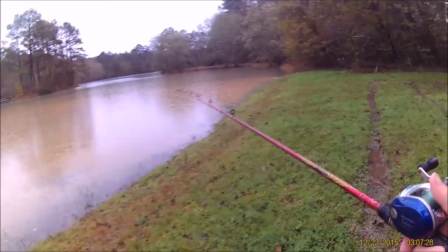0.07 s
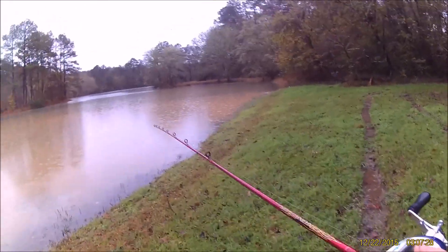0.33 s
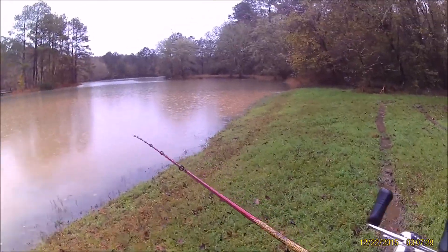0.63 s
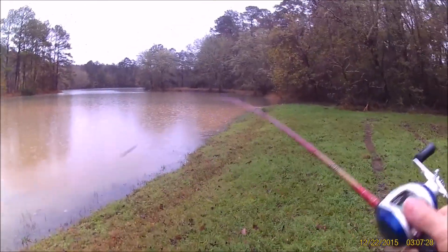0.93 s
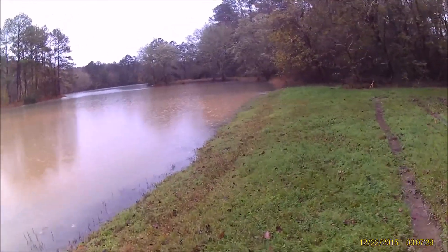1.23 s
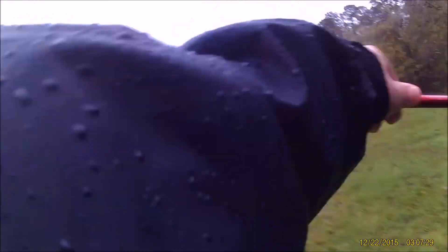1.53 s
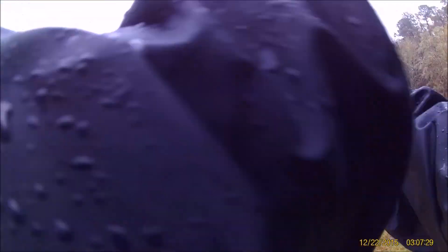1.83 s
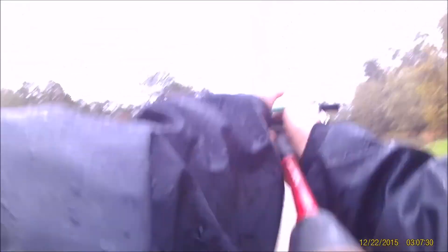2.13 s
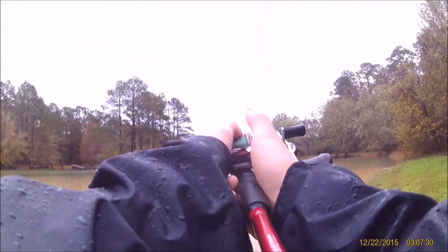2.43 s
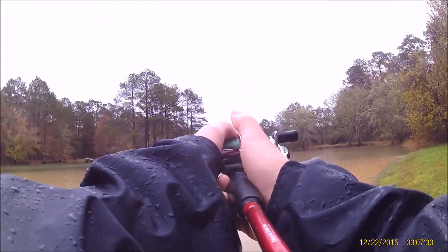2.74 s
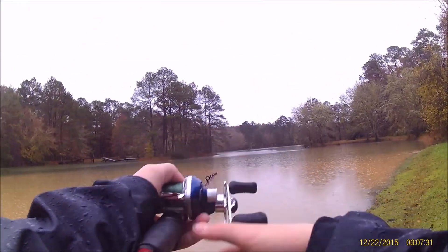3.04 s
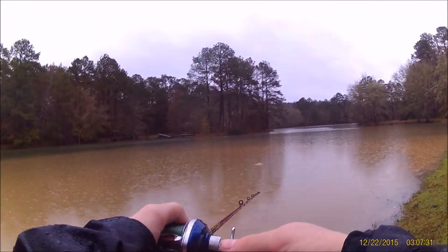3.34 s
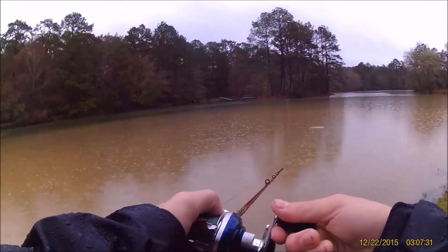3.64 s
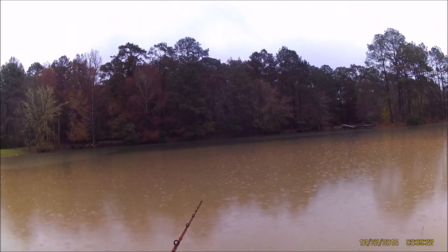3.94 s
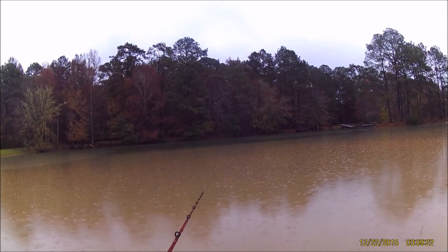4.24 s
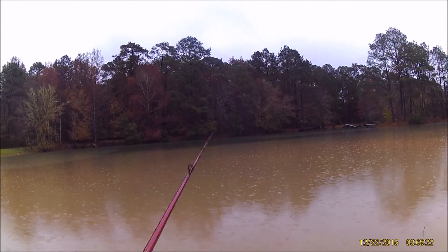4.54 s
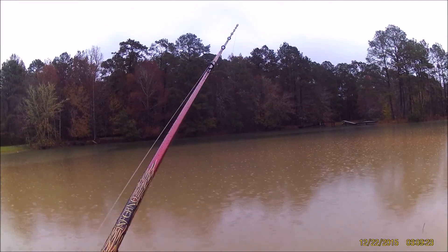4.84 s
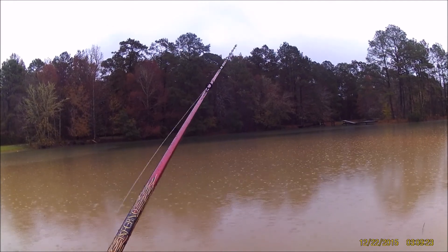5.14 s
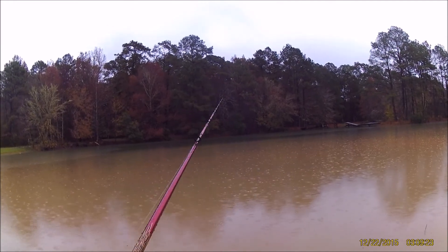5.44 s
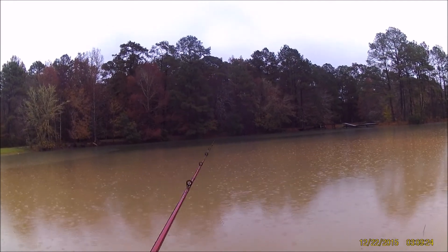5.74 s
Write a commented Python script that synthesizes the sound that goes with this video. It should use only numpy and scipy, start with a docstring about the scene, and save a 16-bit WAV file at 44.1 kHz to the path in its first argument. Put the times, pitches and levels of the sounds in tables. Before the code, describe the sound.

Close sleeve rustle and rumble, a faint whisk of fishing line and one sharp reel click, over light rain and thin electronic hiss.

```python
"""An angler casts across a pond in light rain, heard by a small camera worn on the chest.
From the start, jacket sleeves scrape and rumble on its case over rain, breeze and an electronic whine.
From 1 s the electronics hiss in bursts and drops tick on the case; near 1.7 s the arm bumps it.
At 2.2 s line whisks off the spool, and at 2.8 s the reel snaps into gear.
Then the movements thin out, leaving a deep, even throb under the rain and hiss."""
import sys
import numpy as np
from scipy import signal
from scipy.fft import rfft, irfft
from scipy.io import wavfile
from scipy.ndimage import uniform_filter1d

SR = 44100
rng = np.random.default_rng(int(sys.argv[2]) if len(sys.argv) > 2 else 0)


def pcm_store(signal):
    """Save signal as 16-bit PCM."""
    levels = np.round(np.clip(np.atleast_2d(signal), -1, 1) * 32767)
    wavfile.write(sys.argv[1], SR, levels.astype(np.int16).T)


N = 264070
T = np.arange(N) / SR

# Cloth-on-plastic spectrum: (frequency [Hz], density [dB])
SCRAPE_SPECTRUM = [(300, -17), (450, -5.5), (800, -6.5), (1080, -9), (1320, 3), (1550, 0), (2000, -1.5),
                   (2600, -10), (3050, -18.5), (3500, -18.5), (4400, -23), (5200, -35), (6800, -35.5),
                   (8200, -41)]
# Folding-cloth spectrum: (frequency [Hz], density [dB])
CRINKLE_SPECTRUM = [(2300, 8), (2700, -4), (3100, -7), (3600, -6), (4000, -2.5), (4400, 4), (5200, -3.5),
                    (6300, -9), (7800, -24)]
# Sleeve strokes: (start [s], length [s], scrape level [dB], rumble level [dB])
SLEEVE_STROKES = [(0.0, 0.28, -45, -41), (0.211, 0.33, -42, -35.5), (0.535, 0.43, -51, -45.5),
                  (0.856, 0.14, -43, -43.5), (0.954, 0.2, -38.5, -35), (1.143, 0.77, -44.5, -39),
                  (1.23, 0.32, -41, -33.5), (1.618, 0.27, -32.5, -27), (1.752, 0.14, -32, -31),
                  (1.77, 0.05, -18, -24), (1.885, 0.097, -36.5, -31), (1.983, 0.05, -30, -25),
                  (2.055, 0.14, -49, -41), (2.167, 0.17, -35.5, -33.5), (2.324, 0.24, -41.5, -38),
                  (2.553, 0.25, -52.5, -47.5), (2.96, 0.78, -47.5, -46), (3.082, 0.19, -46, -39.5),
                  (3.603, 0.065, -46.5, -57), (5.51, 0.65, -60.5, -56)]


def sleeve(attack_s=0.035, t60_s=0.14):
    """The weave catches and slips on the case; stiff cloth crinkles as it folds."""
    slips = unit(grains(rate_hz=1800, spread_db=1.5)) + undb(-0.5) * noise()
    scrape = unit(in_case(colour(slips, SCRAPE_SPECTRUM), ring_db=0.5))
    folds = grains(rate_hz=1400, spread_db=1.5)
    crinkle = unit(in_case(colour(folds, CRINKLE_SPECTRUM), ring_db=-4))
    strokes = power_sum(undb(db) * swell(start, length, attack_s, t60_s)
                        for start, length, db, _ in SLEEVE_STROKES)
    effort = strokes * undb(1.2 * walk(70) + 1.0 * walk(18))
    return scrape * effort + undb(-22.5) * crinkle * effort ** 0.8  # crinkle grows more slowly


# Case rumble spectrum: (frequency [Hz], density [dB])
RUMBLE_SPECTRUM = [(32, -29), (55, -8), (80, -4), (119, 1), (161, -5), (199, -5.5), (296, -8), (370, -9),
                   (526, -22), (688, -18.5), (810, -24.5), (900, -35), (1170, -32), (1980, -120)]
# Strap sway spectrum: (frequency [Hz], density [dB])
SWAY_SPECTRUM = [(9, -8.5), (16, -1.5), (23, -0.5), (30, -3.5), (45, -10.5), (62, -13), (90, -34)]
# Body lurches: (start [s], length [s], level [dB])
BODY_LURCHES = [(0.435, 0.12, -36), (0.766, 0.098, -35), (0.962, 0.057, -31.5), (1.645, 0.079, -23.5),
                (2.454, 0.34, -42), (3.613, 0.09, -39)]


def buffeting(throb_start_s=3.05, throb_period_s=0.548):
    """Strokes and breeze rumble in the case and rock it; lurches and a deep throb add to the sway."""
    broad = colour(noise(), RUMBLE_SPECTRUM)
    boom = resonate(colour(noise(), RUMBLE_SPECTRUM), hz=111, width_hz=30)
    rumble = unit(broad + undb(-1.5) * boom)
    sway = unit(colour(noise(), SWAY_SPECTRUM))
    push = power_sum(undb(db) * swell(start, length, attack_s=0.035, t60_s=0.2)
                     for start, length, _, db in SLEEVE_STROKES)
    swing = dict(attack_s=0.023, t60_s=0.31)
    lurch = power_sum(undb(db) * swell(start, length, **swing) for start, length, db in BODY_LURCHES)
    throb = power_sum(swell(start, length_s=0.26, **swing)
                      for start in np.arange(throb_start_s, T[-1], throb_period_s))
    breeze_rumble, breeze_sway = undb(-57 + 1.5 * walk(5)), undb(-53)
    rocking = power_sum([undb(-5.5) * push, lurch, undb(-42.5) * throb, breeze_sway])
    return rumble * power_sum([push, breeze_rumble]) * undb(1.27 * walk(25)) + sway * rocking


# Arm against camera: (time [s], level [dB], pitch [Hz])
ARM_BUMPS = [(1.709, -20, 122), (1.966, -13, 97), (2.409, -20.5, 126)]


def arm_bumps(t60_s=0.079):
    """A padded blow swings the camera for a few cycles."""
    return sum(undb(db) * fade(s, t60_s) * np.sin(2 * np.pi * hz * (T - s)) for s, db, hz in ARM_BUMPS)


# Reel clicks: (time [s], ring level [dB], crack level [dB], crack t60 [s])
REEL_CLICKS = [(1.0243, -32.5, -15.5, 0.021), (2.8061, -5, -7, 0.0077), (2.8282, -43, -52, 0.0098),
               (3.505, -44, -40, 0.042), (3.6107, -36, -52, 0.018), (3.7603, -41, -28, 0.0046)]
# Reel and rod modes: (frequency [Hz], level [dB], t60 [s])
REEL_MODES = [(700, -9, 0.02), (815, -11.5, 0.042), (1010, -0.5, 0.021), (1253, 0, 0.01),
              (1680, 1.5, 0.029), (1825, 2, 0.019), (2040, -1, 0.016), (2540, -4, 0.0088),
              (3350, -12.5, 0.0071), (3990, -11, 0.02), (5300, -14.5, 0.028), (6970, -11, 0.016),
              (7760, -7.5, 0.0039)]
# Metal crack spectrum: (frequency [Hz], density [dB])
CRACK_SPECTRUM = [(500, 4), (1100, -17), (1800, 11), (3000, -6), (4000, 0), (5000, -2.5), (7000, -2.5),
                  (9000, -9.5), (11500, -13.5), (15500, -8)]


def reel():
    """The clutch snaps: metal parts crack, then reel and rod ring."""
    blows, cracks = np.zeros(N), 0
    for s, ring_db, crack_db, t60_s in REEL_CLICKS:
        blows[int(s * SR)] = undb(ring_db)
        cracks += undb(crack_db) * fade(s, t60_s) * noise()
    # Adjacent modes start in antiphase: the ring swells and beats.
    ring = sum((-1) ** k * undb(db) * fade(0, t60_s) * np.sin(2 * np.pi * hz * T)
               for k, (hz, db, t60_s) in enumerate(REEL_MODES))
    return signal.fftconvolve(blows, ring)[:N] + colour(cracks, CRACK_SPECTRUM)


# Spool bands: (centre [Hz], half-width per filter stage [Hz], gain [dB])
SPOOL_BANDS = [(3540, 140, 1.5), (4430, 250, -10), (5000, 120, -3), (5300, 190, -3.5), (6150, 230, -12)]


def running_line():
    """Line whisks through the rod rings as the spool spins up, runs free and is braked."""
    friction = noise()
    whisk = unit(sum(undb(db) * band(friction, hz, 2 * half_hz) for hz, half_hz, db in SPOOL_BANDS))
    spin = swell(start_s=2.175, length_s=0.11, attack_s=0.038, t60_s=0.52)
    return whisk * spin * undb(-43 + 1.8 * walk(61))


# Taps on the case: (time [s], level [dB], pitch [Hz])
CASE_TAPS = [(1.124, -21.5, 1450), (1.638, -29, 1440), (1.7091, -7, 1460), (2.01, -16, 1510),
             (2.0626, -20.5, 1760), (2.2142, -20.5, 1170), (2.679, -26.5, 1960), (2.8983, -27.5, 1590),
             (2.9626, -30, 1600), (3.194, -21.5, 1760), (3.3707, -35, 1460), (5.2866, -30.5, 1920),
             (5.36, -30, 1620), (5.637, -30.5, 1860)]


def taps(t60_s=0.015):
    """Drops and cloth folds strike the case: damped knocks that ring it."""
    knocks = sum(undb(db) * fade(s, t60_s) * (np.sin(2 * np.pi * hz * (T - s)) + 0.23 * noise())
                 for s, db, hz in CASE_TAPS)
    spectrum_hz_db = [(200, -2), (1500, -2.5), (2500, -2), (5000, -10.5), (10000, -34)]
    return in_case(colour(knocks, spectrum_hz_db), ring_db=-2)


# Air modes of the case: (frequency [Hz], width [Hz], gain [dB])
CASE_MODES = [(952, 50, -1), (1325, 34, -2), (1505, 24, 0), (1910, 53, -11), (2680, 190, -10.5),
              (3450, 150, 1), (4310, 380, -1.5)]


def in_case(x, ring_db):
    """The hollow case adds its resonances to whatever touches it."""
    return x + undb(ring_db) * sum(undb(db) * resonate(x, hz, width) for hz, width, db in CASE_MODES)


# Hiss bands: (centre [Hz], width per filter stage [Hz], gain [dB])
HISS_BANDS = [(3350, 600, -6), (6850, 750, -1), (7550, 400, -5), (8450, 550, -9), (10000, 700, -7),
              (11600, 850, 1.5), (13100, 450, -1), (13800, 650, 3.5), (14950, 500, -9), (15600, 400, -12)]
# Hiss pauses: (start [s])
HISS_PAUSES = [2.468, 2.76, 3.059, 3.25, 3.494, 3.835, 4.13, 4.542, 4.9, 5.135, 5.5, 5.701]


def card_hiss(start_s=1.02, pause_s=0.117, block_s=0.034, duty=0.84):
    """Gritty electrical hiss in short blocks, likely as data is written to the memory card."""
    clock_s = T + 0.002 * walk(12)
    starts = [start_s] + [s + pause_s for s in HISS_PAUSES]
    ends = HISS_PAUSES + [T[-1]]
    gate = sum((T > start) * (T < end) * ((clock_s - start) / block_s % 1 < duty)
               for start, end in zip(starts, ends))
    hiss = sum(undb(db) * band(grains(rate_hz=6300, spread_db=3.5), hz, width)
               for hz, width, db in HISS_BANDS)
    level_db = -51.5 + 1.1 * walk(260)
    return undb(level_db) * unit(hiss) * uniform_filter1d(gate.astype(float), size=60)


# Rain on pond and trees: (frequency [Hz], density [dB])
RAIN_SPECTRUM = [(100, 3), (130, -2), (250, -10), (500, -9), (1000, -12.5), (1400, -5.5), (2000, -10.5),
                 (2600, -20), (3400, -22), (5000, -23.5), (8000, -28), (15500, -28.5)]


def rain(wash_db=-51, patter_db=-62):
    """Far drops on water and leaves merge into a wash; near ones patter on the jacket."""
    wash = unit(in_case(colour(noise(), RAIN_SPECTRUM), ring_db=-12.5))
    drift_db = 0.083 * walk(2.14)
    jacket_hz_db = [(900, -3.5), (1500, 0), (2000, 12.5), (2800, -15)]
    patter = unit(colour(grains(rate_hz=260, spread_db=7), jacket_hz_db))
    return undb(wash_db + drift_db) * wash + undb(patter_db) * patter


def whine(hz=13198, restart_hz=81.217, level_db=-61.5):
    """A thin electrical tone; steady restarts split it into close lines."""
    tone = np.sin(2 * np.pi * hz * (T % (1 / restart_hz)))
    return undb(level_db) * unit(resonate(tone, hz, width_hz=700))


def undb(db):
    """Decibels to gain."""
    return 10 ** (np.asarray(db) / 20)


def unit(x):
    """Scale to rms 1."""
    return x / np.sqrt(np.mean(x ** 2))


def noise():
    """White noise."""
    return rng.standard_normal(N)


def walk(rate_hz):
    """Random levels joined by ramps, rms 1."""
    hold = int(SR / rate_hz)
    steps = np.repeat(rng.standard_normal(N // hold + 1), hold)
    return unit(uniform_filter1d(steps, hold)[:N])


def grains(rate_hz, spread_db):
    """Impulses of random time, sign and size."""
    return (rng.random(N) < rate_hz / SR) * noise() * undb(spread_db * np.clip(noise(), -2, 2))


def colour(x, spectrum_hz_db):
    """Minimum-phase filter; falls 20 dB per octave past both ends of the spectrum."""
    hz, db = np.transpose(spectrum_hz_db)
    octave = np.log2(np.maximum(np.fft.rfftfreq(N, 1 / SR), 1))
    outside = np.abs(octave - np.clip(octave, np.log2(hz[0]), np.log2(hz[-1])))
    gain_db = np.interp(octave, np.log2(hz), db) - 20 * outside
    cepstrum = irfft(np.log(undb(gain_db)), N)
    causal = 2 * cepstrum * (np.arange(N) < N // 2)
    return irfft(rfft(x) * np.exp(rfft(causal) - cepstrum[0]), N)


def resonate(x, hz, width_hz):
    """Two-pole resonance, gain 1 at the centre."""
    return signal.lfilter(*signal.iirpeak(hz, hz / width_hz, fs=SR), x)


def band(x, hz, width_hz):
    """Two equal resonances in series."""
    return resonate(resonate(x, hz, width_hz), hz, width_hz)


def fade(start_s, t60_s):
    """Exponential decay from start_s."""
    return (T >= start_s) * undb(-60 * np.clip((T - start_s) / t60_s, 0, 2))


def swell(start_s, length_s, attack_s, t60_s):
    """Movement envelope: rise, hold until length_s is over, decay."""
    rise = np.clip((T - start_s) / attack_s, 0, 1)
    return rise * undb(-60 * np.clip((T - start_s - length_s) / t60_s, 0, 2))


def power_sum(envelopes):
    """Unrelated movements add in power."""
    return np.sqrt(sum(e ** 2 for e in envelopes) + 1e-12)


def scene():
    """All sources at one microphone."""
    handling = sleeve() + buffeting() + arm_bumps() + taps()
    return (handling + running_line() + reel() + rain() + card_hiss() + whine())[None]


def record(dry):
    """The camera clips at full scale and cuts the top."""
    cutoff_hz = 15800
    lowpass = signal.ellip(10, 0.2, 80, cutoff_hz, fs=SR, output="sos")
    return signal.sosfilt(lowpass, np.clip(dry, -1, 1))


dry = scene()
out = record(dry)
pcm_store(out)
```